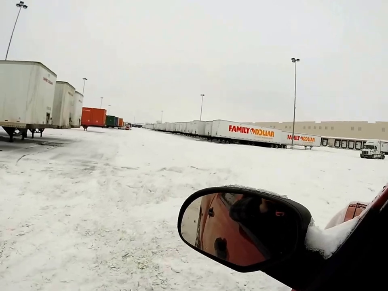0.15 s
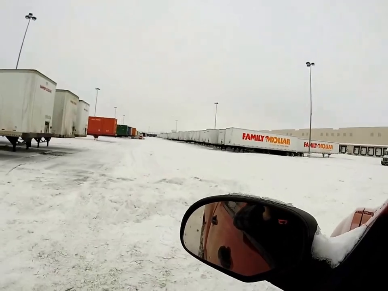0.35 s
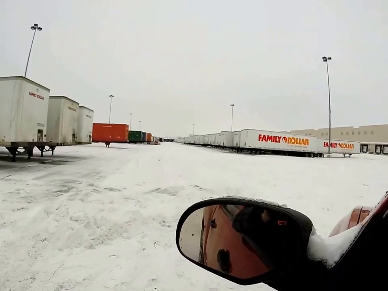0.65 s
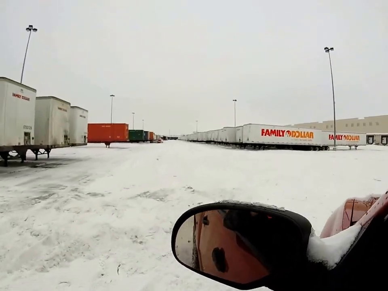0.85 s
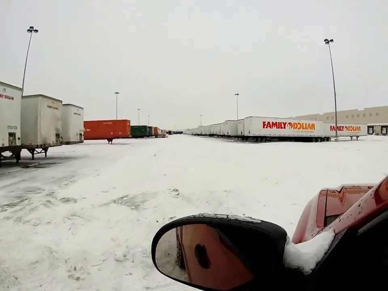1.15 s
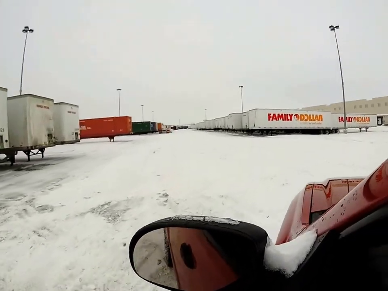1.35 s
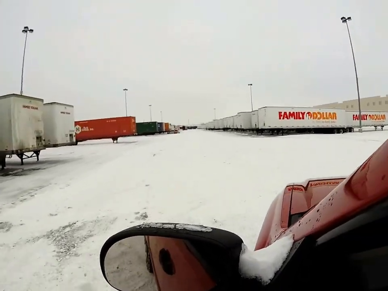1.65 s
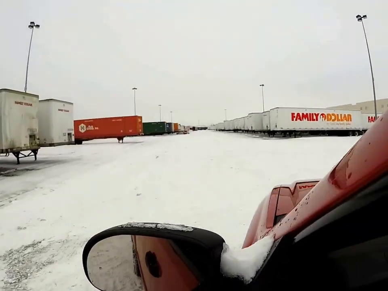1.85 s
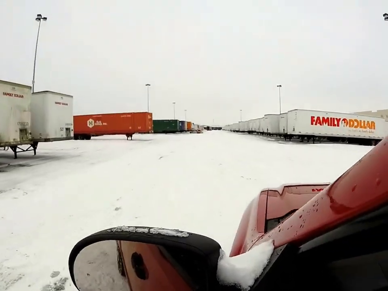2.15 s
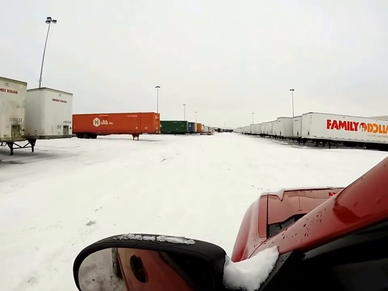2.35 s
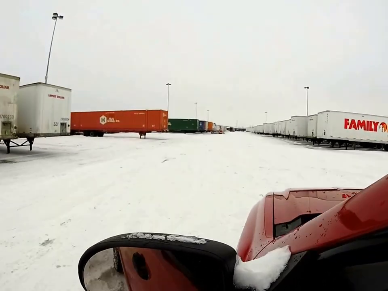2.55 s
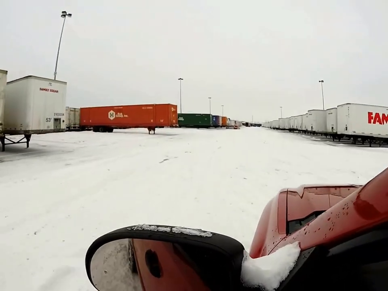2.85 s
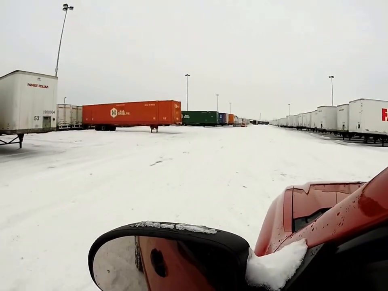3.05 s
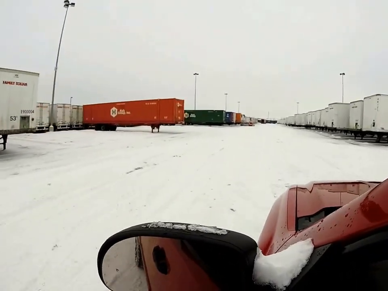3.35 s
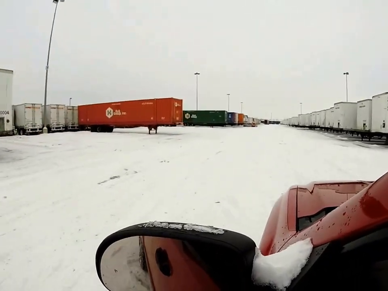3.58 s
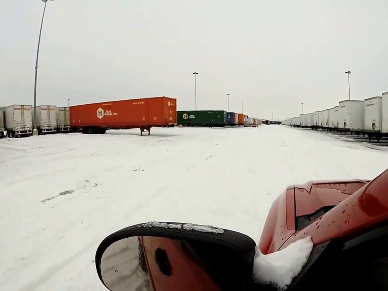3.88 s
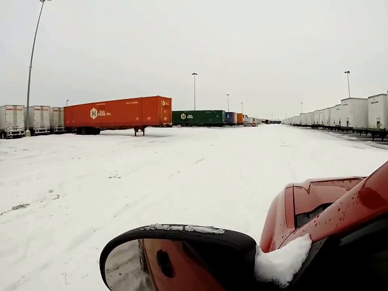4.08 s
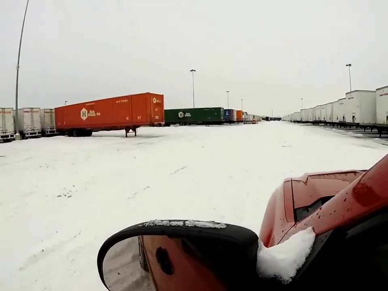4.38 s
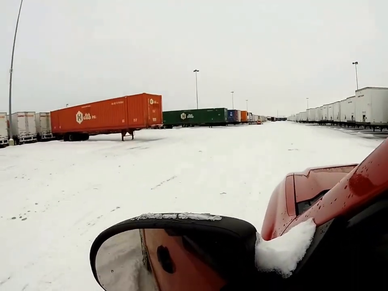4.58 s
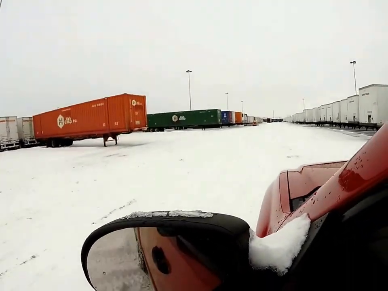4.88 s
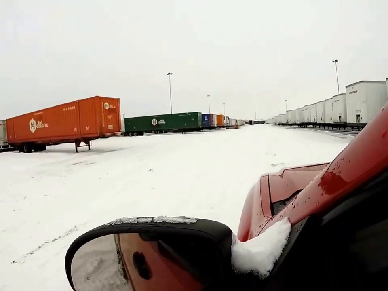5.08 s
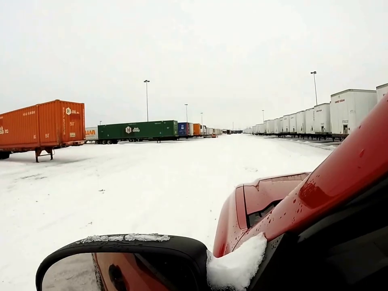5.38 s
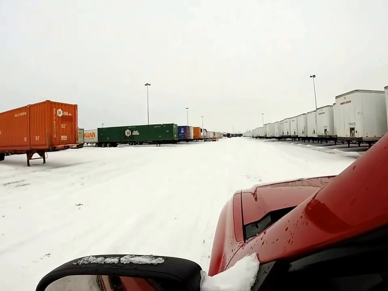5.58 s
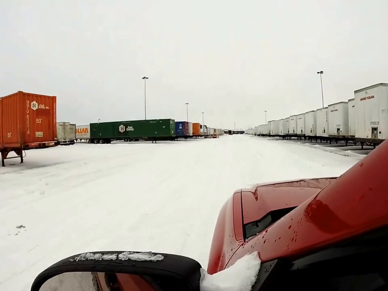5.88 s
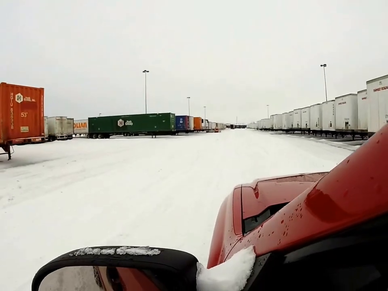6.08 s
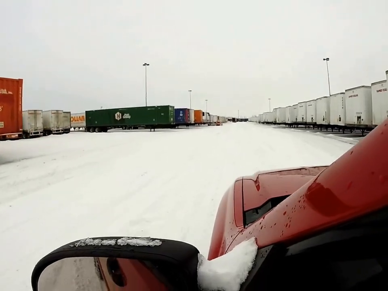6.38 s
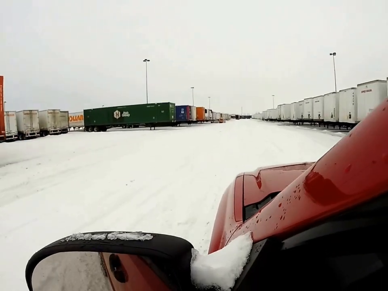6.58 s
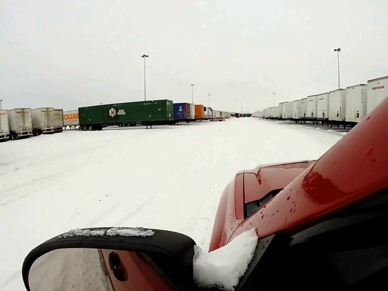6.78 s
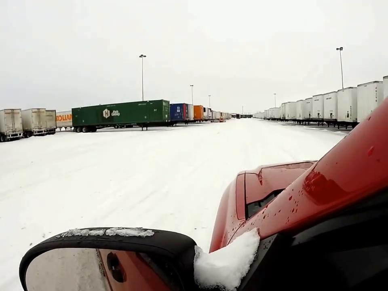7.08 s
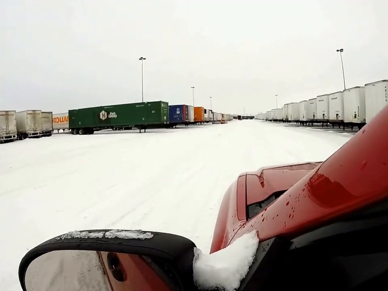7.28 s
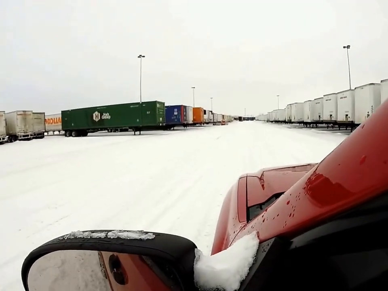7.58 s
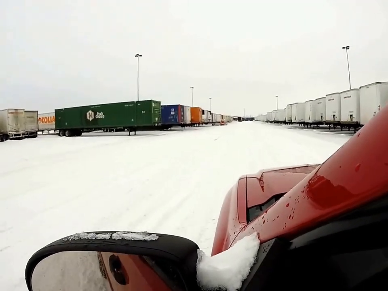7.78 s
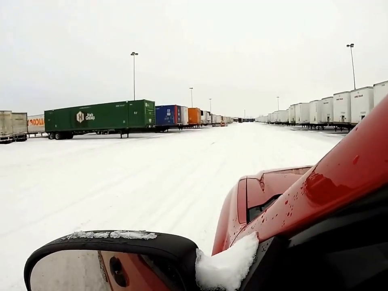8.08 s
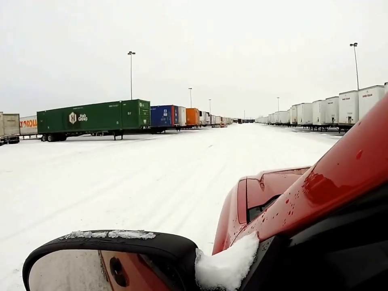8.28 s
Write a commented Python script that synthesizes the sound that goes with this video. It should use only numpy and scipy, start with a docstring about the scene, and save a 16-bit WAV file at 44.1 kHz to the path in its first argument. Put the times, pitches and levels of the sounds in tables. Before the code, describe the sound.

Close, irregular plastic clacks and clicks come from a microphone housing bumping against its mount on a slowly moving vehicle. Beneath them run a quiet, muffled tyre rumble, deep wind flutter and small crunches of packed snow. The hardest knocks cluster just past halfway, mixed with brief glove rubs. Near the end the knocking dies away and the tyres roll on through the snow with a slightly stronger hiss.

```python
"""Camera out of a pickup on snow

A camera in a plastic housing is held out of the window of a pickup rolling slowly over packed snow.
Wind buffets it; tyre rumble and the crunch of snow come through the housing walls, dull and coloured.
Bumps knock the housing against its mount and set both ringing; a glove gives it a few short rubs."""
import sys
import numpy as np
from scipy import signal
from scipy.fft import rfft, irfft, next_fast_len
from scipy.io import wavfile
from scipy.ndimage import uniform_filter1d

SR = 44100
rng = np.random.default_rng(int(sys.argv[2]) if len(sys.argv) > 2 else 0)


def to_wav(sig):
    """Store sig (one row per channel, or 1-D mono) as 16-bit WAV at the path in sys.argv[1].

    Samples outside -1..1 are clipped; the rate is SR.
    """
    pcm = np.clip(np.atleast_2d(sig), -1, 1) * 32767
    pcm = np.round(pcm).astype(np.int16)
    wavfile.write(sys.argv[1], SR, pcm.T)  # frames by channels


N = 372204

# The wind's fader ride. Each row: time in seconds, level in dB.
WIND_RIDE = [(0.0, -47.5), (0.23, -36.5), (0.65, -45), (0.82, -31.5), (1.83, -33), (1.93, -42), (2.07, -23),
             (2.18, -35), (2.47, -20.5), (2.54, -32), (4.96, -27.5), (5.1, -20.5), (5.19, -34.5),
             (6.39, -27.5), (6.44, -31.5), (7.05, -26), (7.14, -42), (8.44, -32)]
# The tyres' fader ride. Each row: time in seconds, rumble level in dB, snow hiss level in dB.
TYRE_RIDE = [(0.0, -49.5, -58.5), (0.73, -49, -61.5), (0.94, -46, -56), (4.21, -47, -58),
             (4.51, -41.5, -49.5), (4.75, -42, -49.5), (5.03, -49, -52.5), (5.22, -40.5, -49),
             (5.55, -42.5, -53.5), (5.81, -47.5, -53.5), (6.16, -45.5, -52), (6.77, -47, -57.5),
             (7.26, -46, -51), (7.62, -46.5, -51), (7.9, -44, -46.5), (8.44, -43.5, -51)]
# Packed snow giving way, felt through the mount. Each row: middle in seconds, level in dB,
# length in seconds.
SNOW_CRUNCHES = [(-0.001, -47.5, 0.13), (0.407, -41.5, 0.049), (0.472, -45.5, 0.046), (0.847, -53, 0.15),
                 (1.024, -45.5, 0.041), (1.082, -45, 0.028), (1.128, -48, 0.056), (1.178, -44.5, 0.046),
                 (1.226, -49, 0.042), (1.621, -39.5, 0.078), (1.744, -42.5, 0.05), (1.811, -38.5, 0.073),
                 (1.993, -45, 0.081), (2.137, -45.5, 0.086), (2.19, -43, 0.04), (2.383, -44, 0.052),
                 (2.426, -43.5, 0.044), (2.515, -52, 0.039), (3.083, -46, 0.048), (3.252, -40.5, 0.032),
                 (3.303, -47, 0.028), (3.395, -42, 0.026), (3.517, -52.5, 0.073), (3.92, -46, 0.075),
                 (4.035, -39, 0.039), (4.171, -44.5, 0.02), (4.273, -47.5, 0.019), (4.613, -30, 0.058),
                 (5.789, -47, 0.031), (6.009, -50, 0.028), (6.171, -45.5, 0.13), (6.233, -42.5, 0.031),
                 (6.375, -41, 0.06), (6.413, -43, 0.023), (6.619, -43.5, 0.024), (6.678, -52, 0.07)]
# Housing hitting mount. Each row: start in seconds, force in dB, then thump, hollow ring and bright
# ring in dB against that force.
KNOCK_CUES = [(0.315, -57, 1, -17, 14), (0.354, -49, 6, -4, 12.5), (0.405, -9.5, -18, -12, -15.5),
              (0.923, -35.5, -6, -11, 0), (0.95, -47, 3.5, 3, -17), (1.4, -40, -1.5, -12, 4),
              (1.623, -24.5, -13.5, -5, 0.5), (1.633, -10.5, -17, -15.5, -15), (1.812, -4, -15, -18, -5.5),
              (1.974, -16, -17.5, -12.5, -14), (2.119, -11.5, -16.5, -9.5, -11), (2.594, -38, -13, -8, -2),
              (2.721, -36.5, -9, -8, -19), (2.859, -23, -9.5, -3, -15), (2.969, -34, -13, -2.5, -1),
              (3, -26, -5.5, -9.5, -21), (3.248, -30.5, -4.5, -9.5, 5), (3.368, -20.5, -18, -3.5, -9),
              (3.517, -44.5, 6, 4, -21), (3.706, -6, -21, -18.5, -17), (3.895, -20, -15.5, -8, -30),
              (4.021, -32, -5, -26, -3), (4.147, -20.5, -10.5, -4.5, -3), (4.316, -45.5, 4.5, 9.5, -18),
              (4.35, -31.5, -6.5, -9, -18), (4.413, -25, -5.5, -5.5, -6), (4.528, -30, -12, -6, 2),
              (4.573, -2.5, -16.5, -16, -4), (4.606, 0.5, -34, -9.5, 5.5), (4.686, -12.5, -16.5, -9, -9),
              (4.7, -19, -15, -16, 1), (4.774, -26, -18.5, -2.5, -9), (4.783, -27.5, -5.5, -21, 3),
              (4.914, -31.5, -3, 1, -28), (5.058, -8.5, -17.5, -12.5, -14.5), (5.088, -12, -33, 1, 4),
              (5.118, -31, -1.5, 7, -17), (5.262, -17, -30, 0, -25), (5.273, -19.5, -7, -7, -9),
              (5.297, -15, -50, -11, 1.5), (5.338, -28.5, -17, -4, -2), (5.406, -18.5, -11, -6.5, -9),
              (5.517, -33, -14.5, 0, -2), (5.744, -26.5, -7, -2.5, -28), (6.113, -32, -9, -1, -17),
              (6.152, -38.5, -1, -31, 10), (6.365, -30.5, -8.5, -7.5, -2), (6.496, -34, 0, 3, -3),
              (6.696, -32.5, -8, -8.5, 3.5), (6.804, -43, 3, -9, -3), (8.218, -45.5, 0, -17, -15)]
# Glove strokes. Each row: time of full pressure in seconds, level in dB, hum in dB, hold in seconds.
GLOVE_STROKES = [(4.362, -33.5, -31, 0.012), (4.495, -38, -52, 0.0038), (5.118, -26.5, -46, 0.006),
                 (5.17, -25.5, -46, 0.05), (5.551, -35, -35, 0.029)]

# EQ curves of the noise layers. Each row: frequency in Hz, relative level in dB.
WIND_EQ = [(4.7, -30), (8.0, 11), (26, 2), (40, -10), (59, -10), (90, -30.5), (120, -26), (160, -79.5),
           (260, -120)]
RUMBLE_EQ = [(29, -32), (50, -4.5), (70, -2), (92, -4), (151, -5), (215, -5), (275, -7.5), (306, -15.5),
             (623, -21.5), (733, -18.5), (888, -23), (950, -26), (1300, -26.5), (1690, -50.5), (2860, -120)]
SNOW_EQ = [(590, -47.5), (1000, -19.5), (1220, -15), (1470, -1.5), (1920, -2), (2130, -2), (2600, -1.5),
           (3180, -10.5), (3540, -11), (4040, -25), (4500, -24), (5850, -25), (9900, -120)]
HISS_EQ = [(1880, -14), (3200, -3), (3550, 0.5), (3870, -3), (4380, 1.5), (4950, -9), (5680, -5.5),
           (6910, -14), (8850, -16.5), (11800, -23), (12600, -24.5), (13400, -30.5), (14500, -35),
           (15200, -82)]
CRUNCH_EQ = [(240, -41.5), (400, -56), (489, -14.5), (778, -1.5), (1020, -10), (1210, -9), (1500, -1.5),
             (1650, -8.5), (1930, 2), (3140, -11.5), (3960, -24.5), (4360, -17), (5000, -34), (6500, -40.5),
             (11000, -120)]
CRACK_EQ = [(1470, -35.5), (2500, 3), (3700, -35.5), (5050, -44.5), (5650, -22), (6570, -48), (15200, -36)]
GLOVE_EQ = [(240, -46.5), (400, -11.5), (576, -15.5), (781, -9), (910, -13.5), (1110, -12), (1390, -1),
            (1500, -12), (1750, -5), (2600, -3.5), (3900, -20.5), (4450, -16), (5000, -25.5), (5920, -18.5),
            (7900, -38.5), (8920, -31), (10000, -34), (11000, -41), (15200, -47.5)]

# Modes of mount and housing. Each row: pitch in Hz, gain in dB, seconds to fall 60 dB, sign of the
# first swing.
MOUNT_MODES = [(76.8, 19, 0.024, 1), (178.4, 4, 0.06, -1), (231.2, 13.5, 0.062, -1)]
HOLLOW_MODES = [(571, -12, 0.02, 1), (783, 1.5, 0.028, -1), (1029, 3.5, 0.014, 1)]
SHELL_MODES = [(1360, 1, 0.021, 1), (1420, -10, 0.05, -1), (1747, -24, 0.019, 1), (1860, -15, 0.065, -1),
               (1760, 13.5, 0.0025, 1), (2282, -1.5, 0.02, -1)]
BRIGHT_MODES = [(2372, -0.5, 0.012, -1), (2670, -3.5, 0.011, 1), (2965, -7, 0.0085, -1),
                (4710, -34, 0.024, 1), (5420, -25, 0.013, -1)]


def from_db(db):
    """Decibels to gain."""
    return 10 ** (np.asarray(db) / 20)


def rms_one(x):
    """Scales to rms 1."""
    return x / np.sqrt(np.mean(x ** 2) + 1e-20)


def faders(rows):
    """Turns each level column of a ride into one value a sample."""
    times, *columns = np.transpose(rows)
    return [np.interp(np.arange(N) / SR, times, column) for column in columns]


def drift(rate_hz):
    """A slow random wobble of rms about 1: low-passed noise, drawn every 40 samples."""
    pole = np.exp(-2 * np.pi * rate_hz * 40 / SR)
    slow = signal.lfilter([1], [1, -2 * pole, pole * pole], rng.standard_normal(N // 40 + 2002))[2000:]
    return np.interp(np.arange(N) / 40, np.arange(len(slow)), rms_one(slow))


def grains(per_s, spread_db, click_share):
    """Grainy texture: random clicks of uneven size blended with smooth noise."""
    sizes = from_db(spread_db * np.minimum(rng.exponential(1, N), 5)) * rng.choice([-1, 1], N)
    clicks = rms_one(sizes * (rng.random(N) < per_s / SR))
    return np.sqrt(click_share) * clicks + np.sqrt(1 - click_share) * rng.standard_normal(N)


def coloured(source, eq, flicker_db, rate_hz, bands=4):
    """EQs a source in overlapping bands that flicker partly together; rms 1."""
    size = next_fast_len(N)
    eq_hz, eq_db = np.transpose(eq)
    log_hz = np.log(np.arange(size // 2 + 1) * SR / size + 1e-3)
    shaped = rfft(source, size) * from_db(np.interp(log_hz, np.log(eq_hz), eq_db, -120, -120))
    centres = np.linspace(np.log(eq_hz[0]), np.log(eq_hz[-1]), bands)
    together, out = drift(rate_hz), 0
    for k in range(bands):
        band = irfft(shaped * np.interp(log_hz, centres, np.arange(bands) == k), size)[:N]
        out = out + band * from_db(flicker_db * (.8 * together + .6 * drift(rate_hz)))
    return rms_one(out)


def resonance(x, hz, width_hz):
    """A resonant band-pass with gain 1 at the centre."""
    r = np.exp(-np.pi * width_hz / SR)
    feedback = [1, -2 * r * np.cos(2 * np.pi * hz / SR), r * r]
    return signal.lfilter([(1 - r * r) / 2, 0, (r * r - 1) / 2], feedback, x)


def ring(force, modes, starts, scatter_db, long_db=0, long_s=.04):
    """A force rings damped modes, varied blow by blow; modes outlasting long_s get long_db added."""
    out, scatter = 0, rng.standard_normal((len(starts), len(modes)))
    latest_blow = np.searchsorted(starts[1:], np.arange(N), "right")
    for k, (hz, level_db, t60, swing) in enumerate(modes):
        r, w = from_db(-60 / (t60 * SR)), 2 * np.pi * hz / SR
        gain = from_db(level_db + scatter_db * scatter[:, k] + long_db * (t60 > long_s))[latest_blow]
        tone = signal.lfilter([0, np.sin(w)], [1, -2 * r * np.cos(w), r * r], gain * force)
        out = out + np.sign(swing) * tone
    return out


def wind(level_db):
    """Gusts buffet the housing: a fluttering sub-bass."""
    return from_db(level_db) * coloured(rng.standard_normal(N), WIND_EQ, -3, rate_hz=10, bands=2)


def tyre_rumble(level_db):
    """Rolling tyres, heard through the housing walls as a dull, restless bed."""
    return from_db(level_db) * coloured(rng.standard_normal(N), RUMBLE_EQ, flicker_db=2.74, rate_hz=16)


def snow_shear(level_db):
    """Tyres shear the snow: a fine, grainy hiss, brighter as it grows."""
    hiss = coloured(grains(2000, spread_db=6.8, click_share=.13), SNOW_EQ, flicker_db=2.1, rate_hz=18)
    presence = np.clip(.08 * (level_db + 53), -.8, 2)
    return from_db(level_db) * (hiss + presence * resonance(hiss, 3230, width_hz=1100))


def hiss_floor(level_db=-62):
    """A thin, nearly steady hiss sits behind everything."""
    return from_db(level_db) * coloured(rng.standard_normal(N), HISS_EQ, flicker_db=.35, rate_hz=10)


def snow_crunches():
    """Each crunch is a short swarm of tiny fractures that swells and fades."""
    envelope = np.zeros(N)
    for middle, level_db, length in SNOW_CRUNCHES:
        span = np.arange(max(round((middle - length / 2) * SR), 0), round((middle + length / 2) * SR))
        arch = np.clip(1 - (2 * (span / SR - middle) / length) ** 2, 0, 1)
        envelope[span] += from_db(level_db) * arch
    fractures = grains(1200, spread_db=2.8, click_share=.6)
    return envelope * coloured(fractures, CRUNCH_EQ, flicker_db=2, rate_hz=60, bands=5)


def crystal_ticks(per_s=14, level_db=-62.5):
    """Single crystals snap at random: faint puffs a few milliseconds long."""
    snaps = np.abs(grains(per_s, spread_db=.95, click_share=.99))
    puffs = uniform_filter1d(uniform_filter1d(snaps, size=130), size=130)
    fizz = coloured(rng.standard_normal(N), SNOW_EQ, flicker_db=1, rate_hz=26, bands=2)
    return from_db(level_db) * rms_one(puffs * fizz)


def housing_knocks(contact_hz=2260, thump_hz=230, crack_boost_db=25.5):
    """A short hard contact rings the shell; the mount takes a softer, later push; hard blows crack."""
    times, force_db, thump_db, hollow_db, bright_db = np.transpose(KNOCK_CUES)
    starts = np.round(times * SR).astype(int)

    def force(level_db, cutoff_hz):
        """One pulse a knock; a lower cutoff makes it longer and later."""
        clicks = np.full(N, 1e-18)
        clicks[starts] = from_db(level_db)
        return signal.sosfilt(signal.bessel(4, cutoff_hz, fs=SR, output="sos", norm="mag"), clicks)

    crack_noise = coloured(rng.standard_normal(N), CRACK_EQ, flicker_db=3, rate_hz=18, bands=2)
    crack = force(force_db + bright_db + crack_boost_db, cutoff_hz=73) * crack_noise
    thump = ring(force(force_db + thump_db, thump_hz), MOUNT_MODES, starts, scatter_db=1.5)
    hollow = ring(force(force_db + hollow_db, contact_hz), HOLLOW_MODES, starts, scatter_db=3.5)
    wall = resonance(force(force_db, contact_hz), 1743, width_hz=448)
    # The shell's long tails speak mostly under hard blows.
    shell = ring(wall, SHELL_MODES, starts, scatter_db=1, long_db=.3 * force_db)
    bright = ring(force(force_db + bright_db, 2 * contact_hz), BRIGHT_MODES, starts, scatter_db=0)
    return thump + hollow + shell + bright + crack


def glove_rubs(attack_db_s=600, rub_release_db_s=345.5, hum_release_db_s=707, hum_lag_s=.0096):
    """Cloth drags over the shell: dense bright slips, which set the mount humming a little later."""
    t = np.arange(N) / SR

    def stroke(full_s, level_db, hold_s, release_db_s):
        """Attack, hold and release of one stroke."""
        fade_in_db = attack_db_s * np.maximum(full_s - t, 0)
        fade_out_db = release_db_s * np.maximum(t - full_s - hold_s, 0)
        return from_db(level_db - fade_in_db - fade_out_db)

    rub_gain = sum(stroke(s, db, hold, rub_release_db_s) for s, db, _, hold in GLOVE_STROKES)
    hum_gain = sum(stroke(s + hum_lag_s, db, hold, hum_release_db_s) for s, _, db, hold in GLOVE_STROKES)
    slips = coloured(grains(2500, spread_db=2.5, click_share=.5), GLOVE_EQ, flicker_db=1, rate_hz=30)
    hum = resonance(resonance(rng.standard_normal(N), 242, width_hz=45), 230, width_hz=72)
    return rub_gain * slips + hum_gain * rms_one(hum)


def scene():
    """Mono mix: a bed of wind, tyres and snow, with knocks and rubs up front."""
    wind_db, = faders(WIND_RIDE)
    rumble_db, snow_db = faders(TYRE_RIDE)
    bed = wind(wind_db) + tyre_rumble(rumble_db) + hiss_floor() + snow_shear(snow_db)
    return (bed + snow_crunches() + crystal_ticks() + housing_knocks() + glove_rubs())[None]


def record(dry, threshold_db=-7, release_db_s=30, cutoff_hz=15150):
    """Gain control ducks after loud knocks and recovers slowly; peaks clip; the top is cut."""
    release = release_db_s * np.arange(N) / SR
    over_db = np.maximum(20 * np.log10(np.abs(dry[0]) + 1e-9) - threshold_db, 0)
    held_db = np.maximum(np.maximum.accumulate(over_db + release) - release, 0)
    duck_db = signal.lfilter([.004], [1, -.996], held_db)   # about 6 ms of attack
    clipped = np.clip(dry * from_db(-duck_db), -1, 1)
    return signal.sosfilt(signal.ellip(10, .5, 60, cutoff_hz, fs=SR, output="sos"), clipped)


dry = scene()
out = record(dry)
to_wav(out)
```